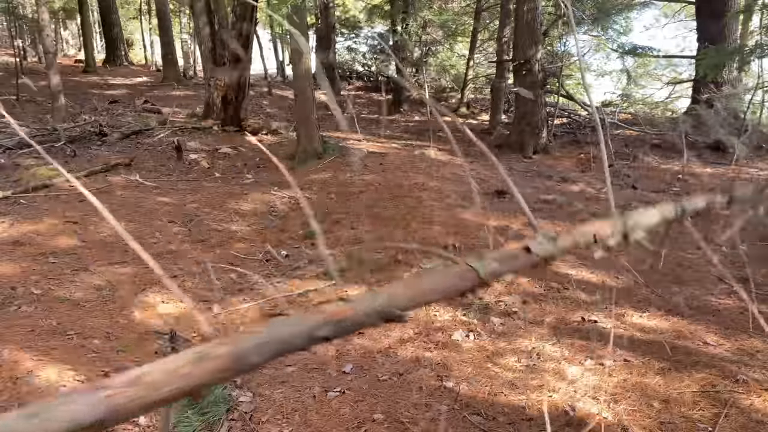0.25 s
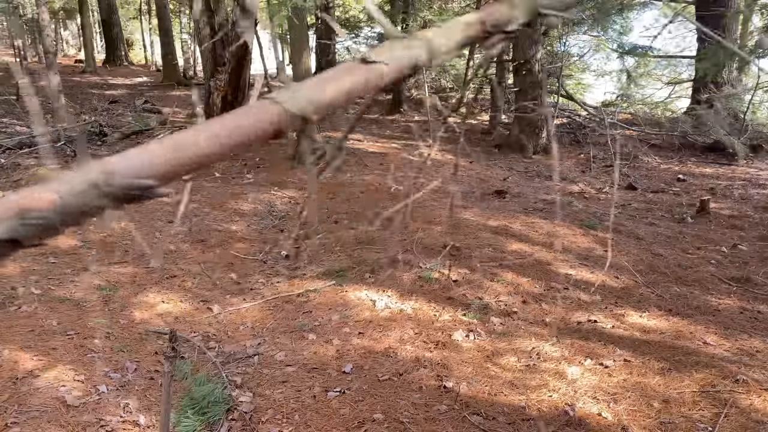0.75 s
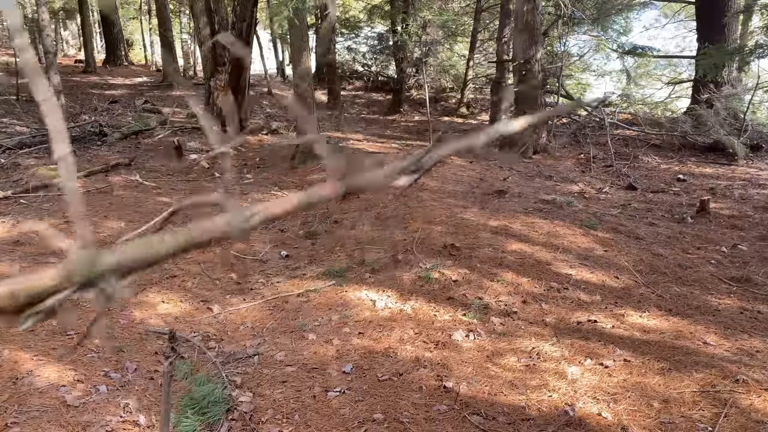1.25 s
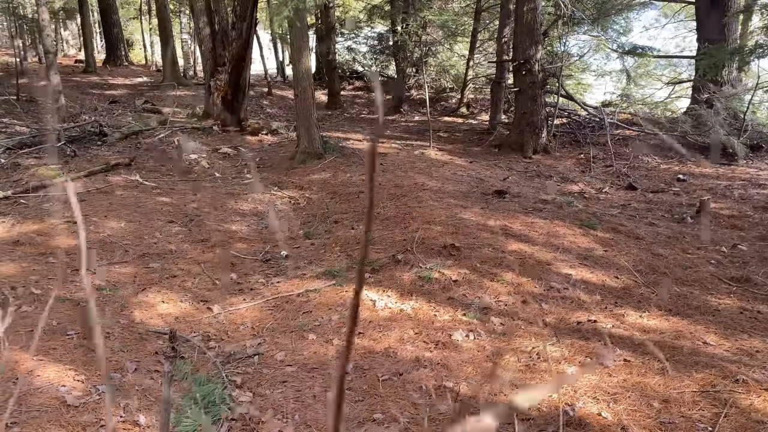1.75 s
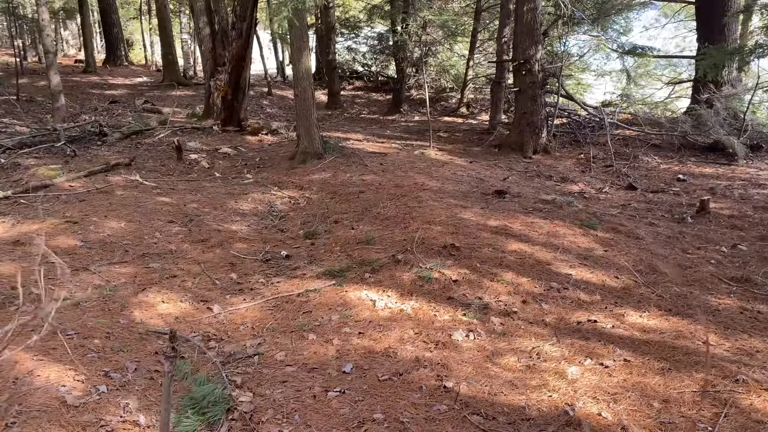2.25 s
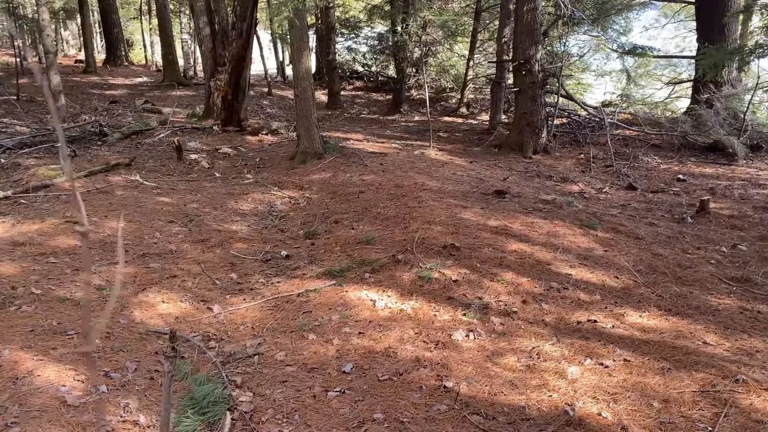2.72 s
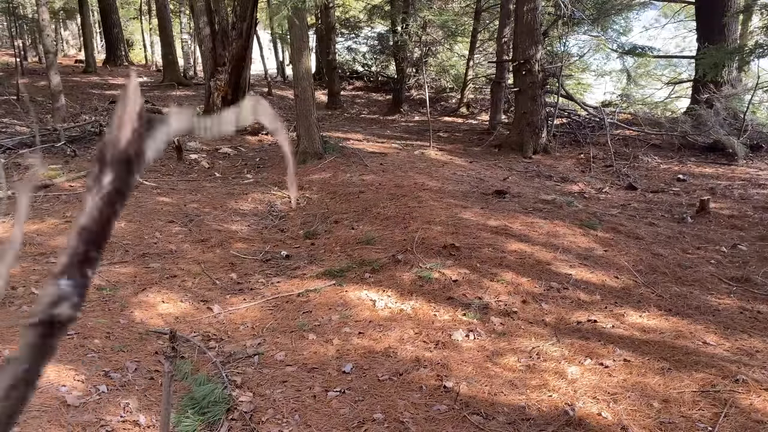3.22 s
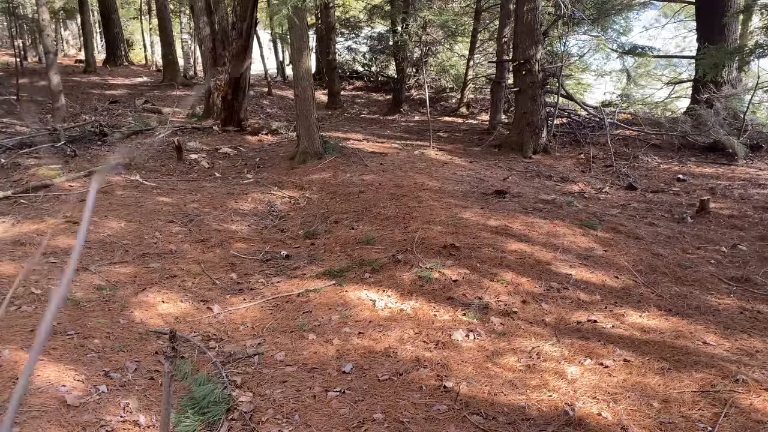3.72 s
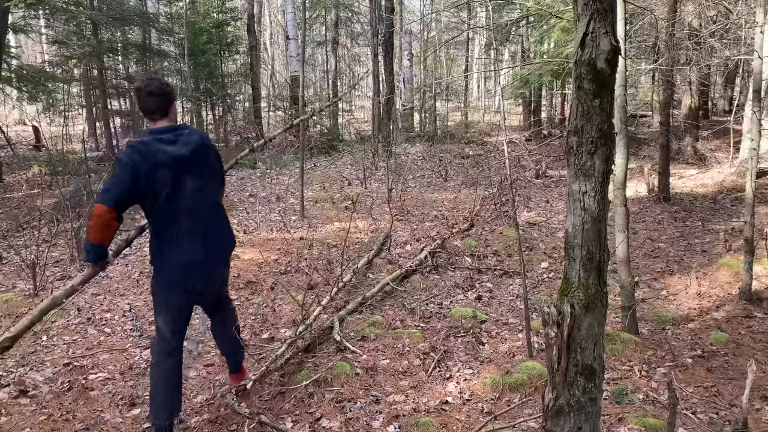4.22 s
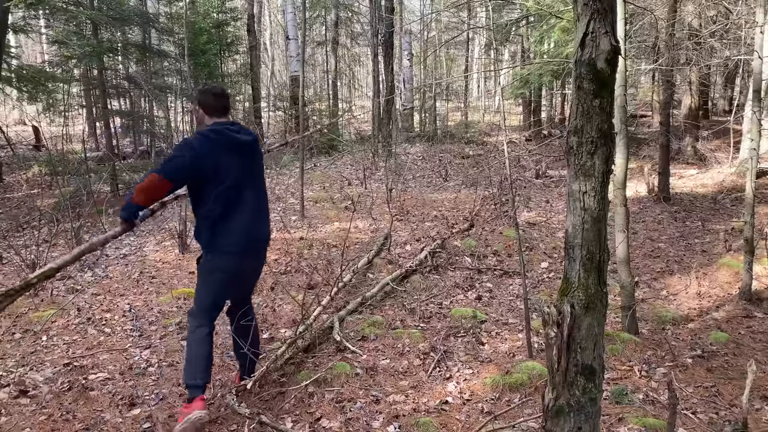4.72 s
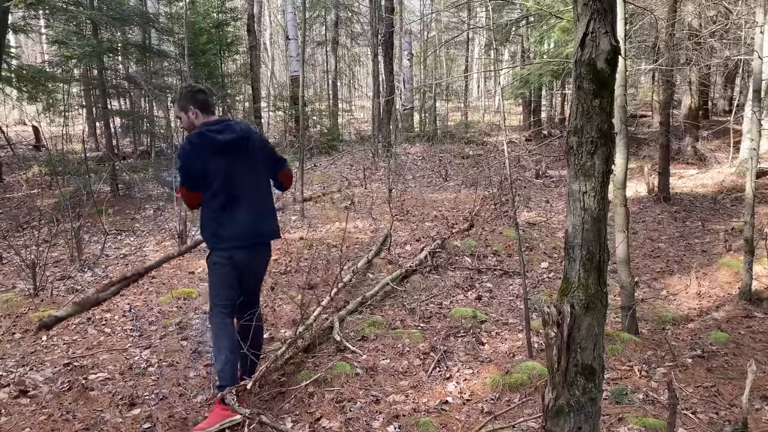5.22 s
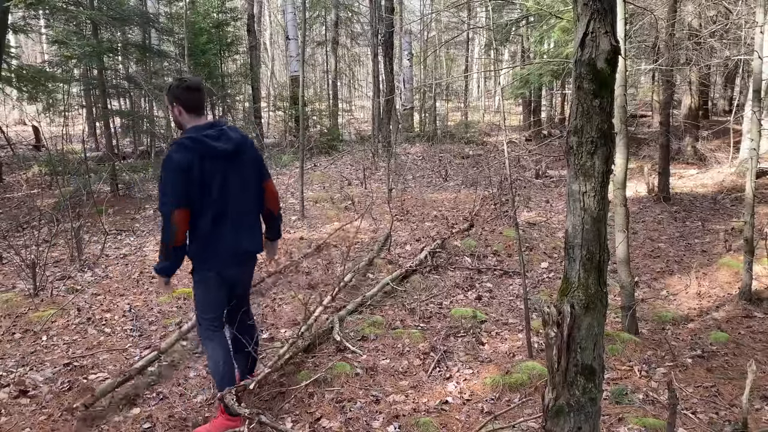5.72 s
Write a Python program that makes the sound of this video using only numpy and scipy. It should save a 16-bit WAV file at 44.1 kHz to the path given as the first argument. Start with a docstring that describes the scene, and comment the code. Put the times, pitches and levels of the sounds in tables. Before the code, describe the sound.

Loud crackling and rustling of a dragged branch ends in a woody thud, then an abrupt change to softer leaf steps and another pole falling.

```python
"""Dry needles and leaves rustle as a dead branch is dragged close by in a pine wood; twigs snap, the pole thumps down.
After a hard cut at 3.975 s someone walks a second pole farther off and drops it. Litter is noise chopped into grains,
twigs are noise bursts around a resonance, knocking wood is rattled and damped rings, thumps are sines that
glide or hold their pitch, and the air in the trees is faint steady noise. A phone's two ports hear it with a phase lag."""
import sys
import numpy as np
from scipy import signal
from scipy.fft import rfft, irfft, next_fast_len
from scipy.io import wavfile
from scipy.ndimage import uniform_filter1d

SR = 44100
rng = np.random.default_rng(int(sys.argv[2]) if len(sys.argv) > 2 else 0)


def log_audio(samples):
    """Write samples as a 16-bit WAV file to the path given in sys.argv[1]."""
    # one column per channel
    frames = np.atleast_2d(samples).T
    # limit to full scale, then quantise
    limited = np.clip(frames, -1, 1)
    pcm = np.round(limited * 32767).astype(np.int16)
    wavfile.write(sys.argv[1], SR, pcm)


def how_loud(loudness_db):
    """Turn decibels into a plain amplitude multiplier (0 dB gives 1, 20 dB gives 10)."""
    steps = np.asarray(loudness_db, float) / 20
    return 10 ** steps


N = 263096
CUT_S = 3.975
SIZE = next_fast_len(N + SR // 4)  # padded, so that filter tails do not wrap round
HZ = np.fft.rfftfreq(SIZE, 1 / SR) + 1e-3  # kept above zero for the logarithms
TIME = np.arange(N) / SR

# twig snaps: start_s, level_db (before the layer gains), treble_db (relative to level_db),
# burst_t60_s (played no longer than 0.15), centre_hz
SNAPS = [(0.2166, -22, -12, 0.14, 4760), (.547, -33, -20, .015, 2100), (.678, -31, -14, .012, 6500),
         (.83, -27, -34, 0.09, 2360), (0.9024, -24, -31, 0.22, 2360), (1.0042, -25, -16, 0.18, 3120),
         (1.087, -21, -13, 0.12, 2040), (1.149, -23, -14, 0.048, 6720), (1.1718, -12.5, -15, 0.02, 3340),
         (1.1851, -7.5, -31, 0.035, 6000), (1.28, -11.5, -20, 0.044, 7000),
         (1.2918, -4.5, -13, 0.015, 7500), (1.308, -11, -10, .03, 6500), (1.3572, -4.5, -11, 0.035, 2430),
         (1.3998, -5.5, -11.5, 0.0083, 2420), (1.467, -1, -11, 0.0091, 6800),
         (1.472, 0.5, -29, 0.014, 5400), (1.5251, -14, -14, 0.042, 5860), (1.6538, -11, -35, 0.18, 3050),
         (1.7239, 1, -17, 0.027, 2600), (1.7776, -7, -12, .016, 7040), (1.8565, -15, -9, .025, 3500),
         (1.8822, -9.5, -50, 0.052, 3560), (1.937, -16, -29, 0.18, 2760), (2.1191, -8.5, -14, 0.032, 4600),
         (2.132, -11, -21, 0.037, 3600), (2.1806, -19, -7, .011, 5500), (2.2895, -9.5, -2.5, 0.0061, 7200),
         (2.2999, 6, -16.5, 0.012, 7440), (2.4367, -2.5, -35, 0.027, 6440), (2.4705, 1.5, -8.5, 0.01, 3440),
         (2.4922, -11.5, -35, 0.059, 6800), (2.5124, -5.5, -16, 0.027, 6650),
         (2.6556, -21, -16, .051, 7300), (2.8061, -12, -26, 0.011, 5100), (2.8506, -10.5, -24, 0.13, 5600),
         (2.918, -14, -19, 0.023, 5500), (3.0693, -14.5, -13, 0.029, 2530),
         (3.2278, -3.5, -14, 0.0087, 6500), (3.4042, -28, -18, .045, 3620), (3.472, -27, -13.5, 0.12, 4460),
         (3.547, -24.5, -17.5, 0.034, 4000), (3.5931, -25, -9, 0.035, 7700),
         (3.6389, -17, -16, 0.044, 7800), (3.8083, -11, -13.5, 0.032, 4400),
         (3.831, -15, -13.5, .034, 4280), (3.8923, -10, -25.5, 0.02, 2080),
         (4.1346, -7, -12.5, 0.032, 7700), (4.4156, -16, -5.5, 0.008, 7860),
         (4.556, -23.5, -12, 0.025, 2970), (4.7463, -35.5, -4, .035, 5920), (4.9404, -39, -5, 0.05, 7150),
         (4.995, -29.5, -15, .012, 3820), (5.19, -33, -9, .03, 3200), (5.402, -31, -12, .013, 7030),
         (5.418, -13.5, -11, 0.021, 2720), (5.4566, 0.5, -16.5, 0.03, 8200),
         (5.5251, -14, -4.5, .012, 7040), (5.5775, -18.5, -16, 0.11, 7100), (5.661, -22, -4, .013, 7240),
         (5.904, -23.5, -7.5, 0.063, 7650)]
# borders between the rumble, scrape, rustle and treble of the litter: border_hz
EDGES_HZ = [259, 1254, 8900]


def shape(x, gain):
    """Multiply the spectrum by a gain per frequency."""
    return irfft(rfft(x, SIZE) * gain, SIZE)[..., :N]


def read(table):
    """Interpolate (Hz, value) rows on a log-frequency axis."""
    hz, value = np.transpose(table)
    return np.interp(np.log(HZ), np.log(hz), value)


def resonance(x, hz, sharpness):
    """A single resonance, gain 1 at its centre."""
    return signal.lfilter(*signal.iirpeak(hz, sharpness, SR), x)


def walk(per_s):
    """Smooth random wander, spread 1."""
    size = int(SR / per_s)
    x = uniform_filter1d(uniform_filter1d(rng.standard_normal(N), size), size)
    return x / x.std()


def grains(per_s, spread_db, tail_s):
    """Envelope of random breaking leaves: few large, many small, each with a short tail; rms 1."""
    size_db = np.minimum(spread_db * rng.exponential(size=N), 15)
    hits = (rng.random(N) < per_s / SR) * how_loud(size_db)
    power = signal.lfilter([1], [1, -np.exp(-1 / (tail_s * SR))], hits ** 2)
    return np.sqrt(power / power.mean())


def band(k):
    """Litter colour in one of four bands (rumble, scrape, rustle, treble), rms gain 1 on white noise."""
    # colour of dry litter: frequency_hz, relative_level_db (per Hz)
    colour = [(30, -23), (70, -3.5), (220, -5), (330, -4), (700, 2), (1200, 2), (1800, 1), (2500, 2),
              (3800, 2.5), (5200, 2.5), (7000, 2.5), (9500, 4.5), (12000, 4.5), (15500, 5)]
    edges = [20.] + list(EDGES_HZ) + [SR]
    below, above = (edges[k] / HZ) ** 6, (HZ / edges[k + 1]) ** 6
    gain = how_loud(read(colour)) / np.sqrt((1 + below) * (1 + above))
    return gain / np.sqrt(np.mean(gain ** 2))


def woods():
    """Faint even hush of air in the trees: steady noise in the scrape, rustle and treble bands."""
    colour = band(1) * how_loud(-8.0) + band(2) + band(3) * how_loud(8.5)
    return how_loud(-74) * shape(rng.standard_normal((2, N)), colour)


def knocks():
    """Wood against wood: a damped ring, roughened by rattling noise in a broad resonance around it."""
    # branch and twigs knocking: start_s, level_db (before ring gain), ring_hz, t60_s, roughness (0 to 1)
    knock_rows = [(.235, -33, 907, 0.055, 0.67), (.273, -32, 303, 0.034, 0.65),
                  (.334, -32, 312, 0.05, 0.83), (.895, -48, 582, .069, 0), (1.297, -35, 1240, .06, 0),
                  (1.4, -20.5, 540, 0.022, .56), (1.474, -14, 1516, 0.024, 0.49),
                  (1.68, -28, 837, 0.1, 0.67), (1.725, -30, 604, 0.11, 0.6), (1.759, -33.5, 764, 0.16, 0.2),
                  (1.819, -26, 1090, 0.052, 0.34), (2.033, -34.5, 630, 0.026, 0.7),
                  (2.301, -25, 643, 0.09, 0.57), (2.376, -34.5, 1190, .037, 0.66),
                  (2.434, -27.5, 1280, 0.048, 0.6), (2.469, -15, 1550, 0.024, 0.39),
                  (2.514, -36.5, 429, 0.09, 0.02), (2.849, -33, 1330, 0.08, 0),
                  (3.045, -34, 908, 0.1, 0.42), (3.636, -39.5, 590, .034, 0.46),
                  (3.811, -34.5, 305, 0.059, 0.5), (4.101, -50.5, 1084, 0.057, .37),
                  (4.134, -15, 1080, 0.034, 0.25), (4.143, -38.5, 646, 0.1, 0.34),
                  (4.155, -44, 1088, 0.11, 0.1), (4.415, -35.5, 490, 0.043, 0.45),
                  (4.554, -49, 792, 0.12, 0.53), (4.945, -44.5, 800, .08, 0.34),
                  (5.093, -54.5, 776, 0.1, 0.25), (5.195, -56, 740, 0.13, 0.44), (5.25, -64, 710, .3, 0),
                  (5.358, -50, 686, 0.07, 0.3), (5.414, -35.5, 1128, 0.089, .1),
                  (5.455, -35, 933, 0.079, .3), (5.462, -36.5, 413, 0.11, 0.33),
                  (5.575, -35, 1355, .077, 0.34), (5.661, -35.5, 1060, .035, 0.37),
                  (5.764, -52, 760, 0.1, 0.25)]
    t = np.arange(SR // 5) / SR
    out = np.zeros((2, N + len(t)))
    for s, level_db, hz, t60, rough in knock_rows:
        ring = rough * 18.0 * resonance(rng.standard_normal((2, len(t))), hz, 1.19)
        ring[0] += (1 - rough) * 3.44 * np.sin(2 * np.pi * hz * t)  # clean tone in the common layer only
        env = (1 - np.exp(-t / 0.0018)) * np.exp(-t * np.log(1000) / t60)
        start = int(s * SR)
        out[:, start:start + len(t)] += how_loud(level_db) * env * ring
    return shape(out[:, :N], 1 / (1 + (HZ / 1820.0) ** 4))


def thumps():
    """Damped sines: thumps glide quickly, mostly down; the landing pole rings at steady pitches."""
    # wood and feet meeting the ground: start_s, level_db (before the swell), first_hz, last_hz, t60_s
    ground_hits = [(.338, -44, 500, 120, .025), (1.025, -46, 90, 55, 0.33), (1.477, -21.5, 303, 106, 0.017),
                   (3.23, -13.5, 376, 89, 0.0095), (3.893, 2, 1450, 418, .035),
                   (3.898, 3.5, 457, 83, 0.058), (3.899, -13.5, 59.8, 43.8, .17),
                   (4.61, -50, 100, 69, 0.21), (4.71, -49, 100, 69.5, 0.23), (5.512, -29, 201, 110, 0.086),
                   (5.544, -26, 111, 67, 0.22), (5.7, -35.5, 87, 91.5, 0.31), (5.89, -39, 90, 75, 0.22)]
    # modes of the pole landing beside the phone: pitch_hz, level_db (before the swell), t60_s
    pole_modes = [(649, 12, 0.031), (1050, -8, 0.034), (1430, -9.5, .03)]
    landing_s, landing_swell_s = 3.8855, 0.006
    rings = [(*row, 0.029 * row[-1]) for row in ground_hits]  # swell time is a share of t60
    rings += [(landing_s, db, hz, hz, t60, landing_swell_s) for hz, db, t60 in pole_modes]
    out = np.zeros(N)
    for s, level_db, first_hz, last_hz, t60, swell_s in rings:
        t = np.maximum(TIME - s, 0)
        hz = last_hz + (first_hz - last_hz) * np.exp(-t / 0.0028)
        env = (1 - np.exp(-t / max(swell_s, 1e-4))) * np.exp(-t * np.log(1000) / t60)
        phase = 2 * np.pi * np.cumsum(hz * (t > 0)) / SR
        out += how_loud(level_db) * env * np.sin(phase)
    return out * ((TIME < CUT_S) | (TIME > 4.1))  # no ring carries over the cut


def brushing():
    """Rustle, scrape, rumble and relative treble levels in dB of branch and feet brushing steadily."""
    # brushing through litter, one list before and one after the cut: time_s, rustle_db, wood_scrape_db,
    # ground_rumble_db (all before the grain gains), treble_db (relative to rustle)
    steady = [
        [(0.0, -46.5, -50.5, -80, -5), (0.22, -50, -49, -80, 2.5), (0.35, -51.5, -64.5, -65.5, -6),
         (0.7, -56, -62, -69, -11), (0.89, -59, -69, -76, -14), (0.97, -56, -67, -70, -3),
         (1.1, -44, -51.5, -66, -2), (1.35, -55, -46, -67, -30), (1.49, -39, -52, -60, -4),
         (1.7, -41.5, -44, -59, -4), (1.83, -35, -39, -51, -10.5), (2.09, -38.5, -44, -55, -4.5),
         (2.55, -41, -45, -60.5, -13), (2.68, -37, -50, -62, -1), (2.92, -40.5, -43, -60, -6.5),
         (3.08, -37, -47, -59, -1), (3.22, -45, -57, -61, -8.5), (3.45, -75, -76.5, -73.5, -5),
         (3.58, -44.5, -66.5, -64.5, -4), (3.71, -42, -52.5, -55.5, -5.5), (3.79, -49.5, -59, -58, -9),
         (3.84, -54, -58, -56.5, -7), (3.91, -60, -69.5, -52, -7.5), (3.97, -52, -76, -56, -3)],
        [(3.98, -79, -90.5, -76.5, -3.5), (4.162, -60.5, -73.5, -73.5, -9.5), (4.288, -47.5, -55, -70, -0.5),
         (4.438, -51, -57, -65.5, -4.5), (4.582, -57.5, -61.5, -66.5, 0), (4.752, -54.5, -66, -78, 3.5),
         (5.002, -58.5, -72.5, -75.5, -2.5), (5.134, -54, -71.5, -79, 3), (5.328, -51, -62, -65, -6.5),
         (5.41, -43, -51, -67, -4), (5.538, -44, -48, -61, -3), (5.636, -43.5, -50, -51, -10),
         (5.814, -51, -59.5, -63, 2), (5.966, -50, -63, -61, -1)],
    ]
    s, *columns = np.vstack(steady).T
    return np.array([np.interp(TIME, s, c) for c in columns])


def small_snaps():
    """Small twigs crack at random moments, louder where the brushing is louder; rows like SNAPS."""
    count, t60_s, treble_db = 50, 0.003, -2.5
    above_brushing_db, spread_db = 11.5, 2.5
    low_hz, high_hz = 2401, 7499
    s, size, pitch = rng.random((count, 3)).T
    s = s * TIME[-1]
    # few large, many small
    level_db = np.interp(s, TIME, brushing()[0]) + above_brushing_db - spread_db * np.log(size + 1e-3)
    centre_hz = low_hz + (high_hz - low_hz) * pitch
    return [(a, b, treble_db, t60_s, c) for a, b, c in zip(s, level_db, centre_hz)]


def snaps():
    """A short hiss swells into a sharp tick, then a rough noise burst dies away around a centre pitch."""
    lead = SR // 100  # room for the hiss ahead of the tick
    t = np.arange(-lead, SR // 8) / SR
    layers = np.zeros((2, 2, N + len(t)))  # body and treble, each common and other
    for s, level_db, treble_db, t60, centre_hz in SNAPS + small_snaps():
        noise = rng.standard_normal((3, 2, len(t)))
        at = slice(int(s * SR), int(s * SR) + len(t))
        fall = np.log(1000) / np.clip(t60, .003, .15)
        tick = np.exp(-abs(t) / 0.00012)
        roughness = how_loud(12.25 * uniform_filter1d(noise[2, 0], 16))  # random flutter, about 3 dB
        swell_and_fall = np.exp(-np.maximum(t, 0) * fall + np.minimum(t, 0) * fall * 6.3)
        burst = tick + 0.5 * roughness * swell_and_fall
        crack = how_loud(level_db) * burst * noise[0]
        layers[0, :, at] += .5 * crack + 0.97 * resonance(crack, centre_hz, 6.2)
        layers[1, :, at] += how_loud(level_db + treble_db) * burst * noise[1]
    body, treble = layers[..., lead:lead + N]
    return how_loud(-4.5) * shape(body, band(2)) + how_loud(6.0) * shape(treble, band(3))


def stirred():
    """Power sum of brushing, sweeps and bursts around listed snaps, in dB: rustle, scrape, rumble, treble."""
    # sweeps of the branch and footfalls through litter: start_s, hold_s,
    # rustle_db, scrape_db, rumble_db (all before the grain gains)
    sweeps = [(0.036, 0.015, -42.5, -48, -74), (0.212, 0.047, -35, -40.5, -50),
              (0.294, 0.05, -36, -45, -52.5), (0.57, 0.046, -55.5, -61, -74),
              (0.844, 0.0089, -73, -57.5, -80), (0.917, 0.011, -58, -52.5, -64),
              (1.011, 0.032, -42, -47.5, -69), (1.193, 0.033, -29.5, -35.5, -70),
              (1.302, 0.014, -37, -38.5, -58), (1.356, 0.0088, -26, -37.5, -53),
              (1.425, 0.051, -31, -38, -46), (1.526, 0.0081, -41, -43, -66), (1.658, .05, -32, -35, -50),
              (1.74, .02, -35.5, -36.5, -55), (1.808, 0.03, -34, -37.5, -58),
              (2.672, 0.096, -36, -43.5, -59), (2.78, 0.14, -35.5, -52.5, -57),
              (3.036, 0.033, -56, -42.5, -63.5), (3.397, 0.12, -47.5, -61, -68.5),
              (3.468, .01, -51, -71, -62.5), (3.621, .04, -46, -53, -67), (3.682, 0.048, -48, -51, -52),
              (3.807, 0.047, -36.5, -58, -54), (3.893, 0.0032, -42.5, -36, -28.5),
              (4.151, 0.052, -42, -47.5, -64.5), (4.327, 0.041, -40, -55, -64.5),
              (4.565, 0.018, -46.5, -60.5, -65), (4.611, 0.072, -47, -63, -66.5),
              (4.952, 0.054, -50, -63, -65), (5.082, 0.035, -48, -60.5, -83.5),
              (5.43, 0.016, -45, -48, -74), (5.481, 0.052, -30.5, -38.5, -51.5),
              (5.86, 0.021, -42.5, -52.5, -71)]
    # burst of litter sound around each listed snap, relative to its level: rustle_db, scrape_db, rumble_db
    snap_burst_db = np.array((-25, -33, -52))
    sweep_slopes, snap_slopes = (461.5, 316), (4001, 897.5)  # rise and fall, dB per second
    *steady_db, treble_db = brushing()
    power = how_loud(2 * np.array(steady_db))
    bursts = [(s, hold, db, *sweep_slopes) for s, hold, *db in sweeps]
    bursts += [(s, 0, db + snap_burst_db, *snap_slopes) for s, db, *_ in SNAPS]
    for s, hold, db, rise, fall in bursts:
        end = s + hold + .3
        if s <= CUT_S:
            end = min(end, CUT_S)  # the cut ends whatever is still falling
        at = slice(max(int((s - .2) * SR), 0), int(end * SR))
        t = TIME[at] - s
        slope_db = rise * np.minimum(t, 0) - fall * np.maximum(t - hold, 0)
        power[:, at] += how_loud(2 * (np.array(db)[:, None] + slope_db))
    levels_db = 10 * np.log10(power)
    return [*levels_db, levels_db[0] + treble_db]


def litter():
    """Noise chopped by leaf grains; each half octave has grains and swells of its own besides the shared ones."""
    rustle_db, scrape_db, rumble_db, treble_db = stirred()
    rumble_env = how_loud(rumble_db) * grains(160, 7.1, 0.012)
    out = shape(rng.standard_normal((2, N)) * rumble_env, band(0))
    crackle = grains(700, 2.6, 0.0016)  # shared by all bands above the rumble
    for k, level_db in ((1, scrape_db), (2, rustle_db), (3, treble_db)):
        level, colour = how_loud(level_db), band(k)
        centres = EDGES_HZ[k - 1] * 2 ** np.arange(.25, 2.5 if k < 3 else 1, .5)
        near = 1 / (1 + (np.log2(HZ[:, None] / centres) / .25) ** 6)
        share = np.sqrt(near / near.sum(axis=1, keepdims=True))  # the slices' powers add up to the band
        for j, hz in enumerate(centres):
            own = grains(.04 * hz, 0.91, 17.0 / hz) * how_loud(2.07 * walk(24))
            chopped = rng.standard_normal((2, N)) * level * (0.65 * own + 0.51 * crackle)
            out += shape(chopped, colour * share[:, j])
    return out


def ports(common, other):
    """Right port: partly the left port's sound, partly its own, shifted in phase and level."""
    # phase between the ports before the cut: frequency_hz, left_lead_rad
    lead_near = [(0, 0), (520, 2.1), (1460, 2.9), (2840, 6.9), (3880, 7.1), (5300, 5.3), (6400, 6.9)]
    # the same after the cut: frequency_hz, left_lead_rad
    lead_far = [(0, 0), (700, .5), (2330, 1.5), (4300, .85), (5500, 3.1), (6400, 7.3)]
    # the treble lag throughout, opposite phase near 9 and 13 kHz: frequency_hz, left_lead_rad
    lead_treble = [(6900, 6.55), (7400, 5.8), (8960, np.pi), (11050, 0), (11500, -.4), (13180, -np.pi),
                   (15200, -6.15), (16700, -6.4)]
    # sound common to both ports: frequency_hz, amplitude_share (0 to 1)
    likeness = [(60, 0.86), (300, 0.89), (1200, 0.67), (2200, 0.18), (3300, 0.6), (4800, 0.25),
                (5800, 0.073), (6900, 0.6), (8000, 0.99), (16000, 1)]
    # level between the ports: frequency_hz, left_minus_right_db
    balance = [(60, 0), (250, 0), (400, 2.5), (700, 5.5), (1290, 2.5), (2380, 2.5), (4400, 4.5), (6500, 3),
               (8000, 0), (15000, 0)]
    like = np.clip(read(likeness), 0, 1)
    half = how_loud(read(balance) / 2)  # half the difference goes to each port
    left = shape(common, half)
    right = shape(common, like / half) + shape(other, np.sqrt(1 - like ** 2) / half)
    lagged = np.zeros(N)
    for part, lead in ((TIME < CUT_S, lead_near), (TIME >= CUT_S, lead_far)):
        lag = np.interp(HZ, *np.transpose(lead + lead_treble))
        lagged += shape(right * part, np.exp(-1j * lag))
    return np.array([left, lagged])


def scene():
    """Litter, snaps, knocks, thumps and the hush as the two ports hear them."""
    common, other = woods() + knocks() + snaps() + litter()
    return ports(common + thumps(), other)


def band_limit(x):
    """A steep low-pass at the top of the band."""
    return signal.sosfilt(signal.butter(12, 17140, fs=SR, output="sos"), x)


def record(dry):
    """The phone rounds the loudest peaks and drops the top of the treble."""
    rounded = np.tanh(1.15 * dry) / 1.15
    # down 20 dB above 15.8 kHz and a further 60 dB above 17.1 kHz
    shelf_db = -20 / (1 + np.exp((15800 - HZ) / 40)) - 60 / (1 + np.exp((17100 - HZ) / 40))
    mix = shape(rounded, how_loud(shelf_db))
    return band_limit(mix)


dry = scene()
out = record(dry)
log_audio(out)
```